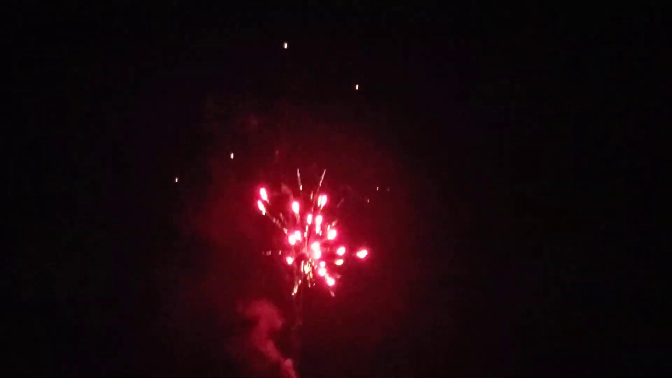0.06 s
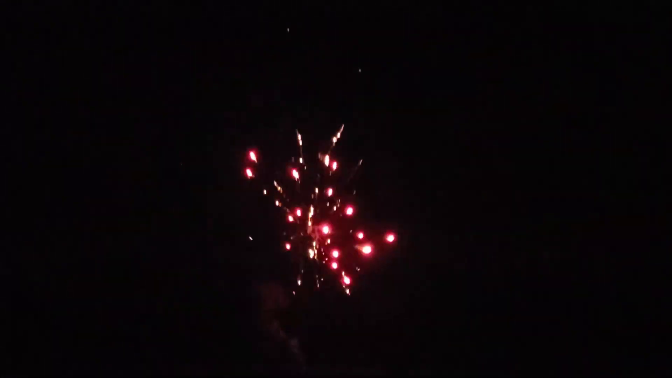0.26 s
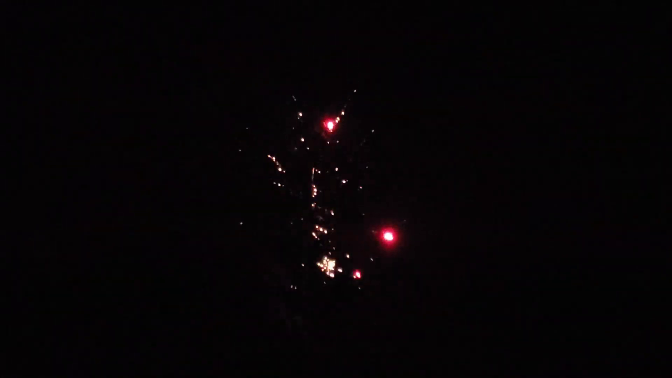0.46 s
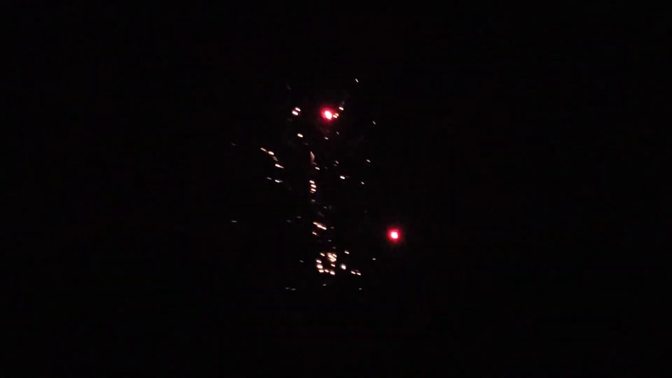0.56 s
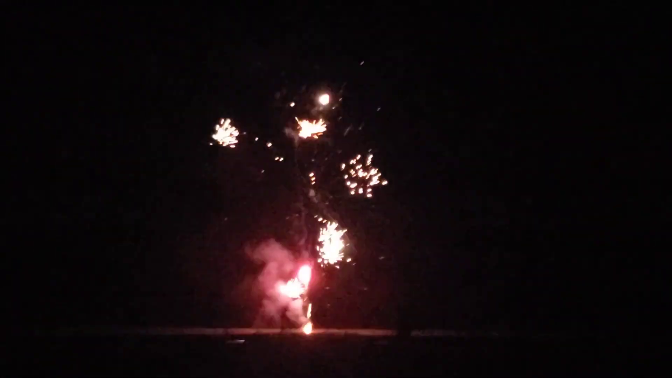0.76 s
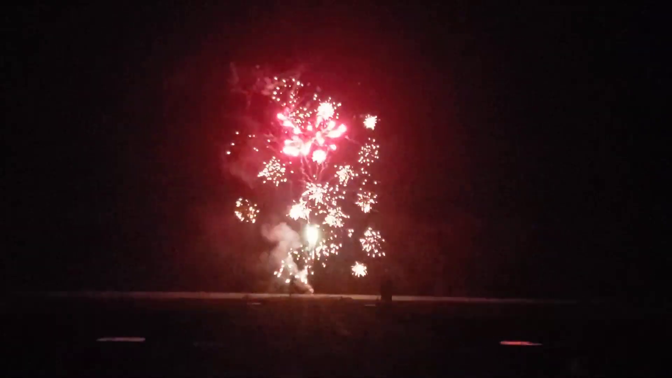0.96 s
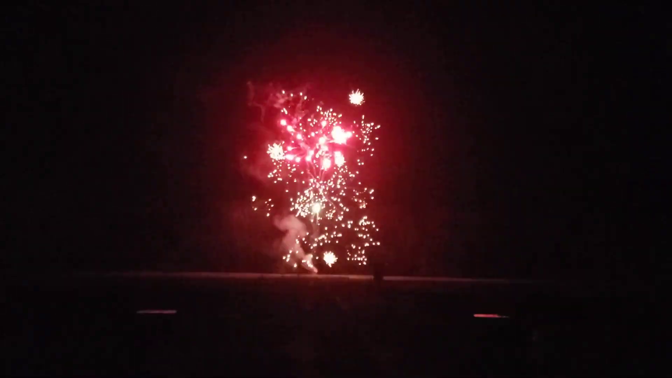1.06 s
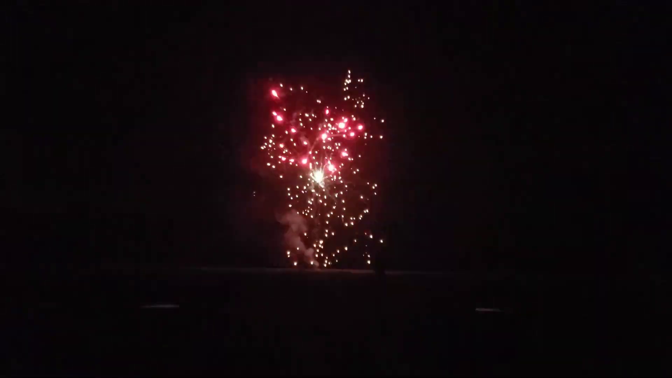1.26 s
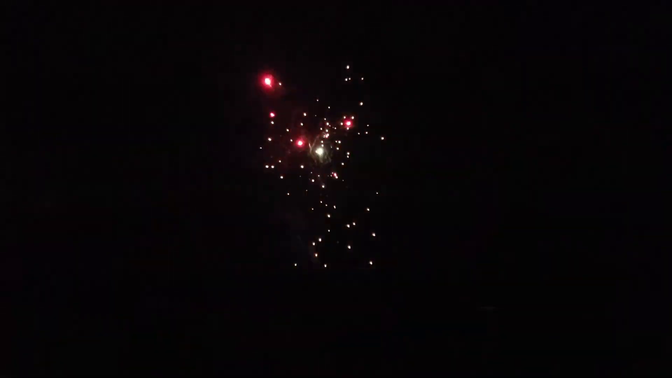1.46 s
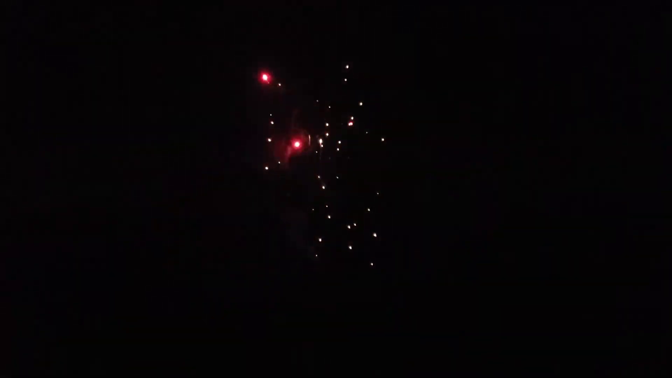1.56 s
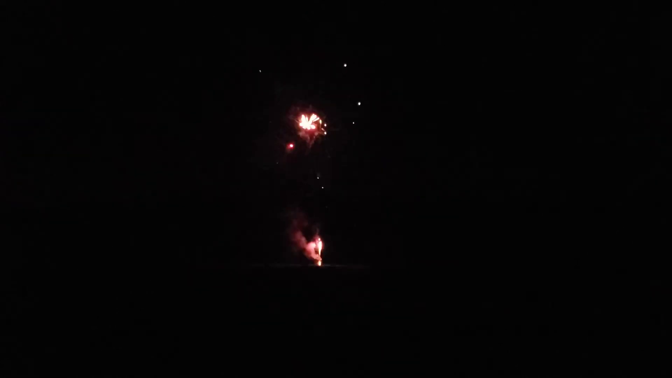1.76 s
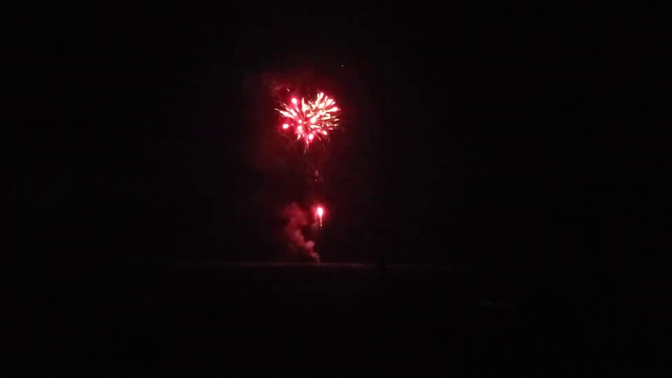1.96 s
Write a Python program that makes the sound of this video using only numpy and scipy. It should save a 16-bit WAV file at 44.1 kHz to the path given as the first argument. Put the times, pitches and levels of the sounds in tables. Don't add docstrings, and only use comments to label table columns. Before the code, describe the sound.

A dry firework crack with low thump, then near quiet with a high insect buzz; about a second later a launch pop, another bang and a rapid volley of crackles, outdoors at night, uneven stereo, brighter right.

```python
import sys
import numpy as np
from scipy import signal
from scipy.fft import rfft, irfft, next_fast_len
from scipy.io import wavfile

SR = 44100
rng = np.random.default_rng(int(sys.argv[2]) if len(sys.argv) > 2 else 0)


def volts(x):
    e = np.asarray(x, float) / 20
    return 10 ** e


def wav_out(sig):
    wavfile.write(sys.argv[1], SR, np.round(np.clip(np.atleast_2d(sig).T, -1, 1) * 32767).astype(np.int16))


N = 88200
MS = 1e-3

# (peak [dB], pulse length [ms], ground echo [dB], boom [dB], boom pitch [Hz], clutter [dB])
BLASTS = [
    (4.5, 0.49, -5.5, 0.5, 72, -16),
    (5.5, 0.27, -12.5, -4, 95, -2),
    (-16.5, 0.09, -14, -57, 55, 6.5),
]
# (time [s], ground echo delay [ms])
BLAST_TIMES = [
    (.2312, 1.2),
    (1.1564, 2.6),
    (1.0344, 1.1),
]
# (time [s], peak [dB], ground echo delay [ms], ground echo [dB])
STARS = [(.1095, -13, 1.8, -6), (1.0669, -14, 1.3, 0), (1.1696, -9, 1.1, -4), (1.1816, -13, 1.1, 0),
         (1.2172, -13, 1.4, -7), (1.2221, -12, 1.9, -5), (1.2497, -10, 1., -8), (1.2691, -12, 1.1, 0),
         (1.2739, -12, 1., -7), (1.2791, -13, 1., -4), (1.2871, -18, 1.1, -8), (1.2892, -10, 1.3, -5),
         (1.3223, -10, 1.5, -4), (1.3251, -12, 1.1, -3), (1.3323, -12, 1.9, -3), (1.3399, -12, 1., -8),
         (1.3462, -14, 1.1, -3), (1.3572, -13, 2., 0), (1.3661, -11, 1., -8), (1.3736, -12, 1., -8),
         (1.3897, -14, 1.4, -1), (1.4056, -12, 1.5, 3), (1.4204, -17, 1.9, 3), (1.4301, -12, 1.1, -8),
         (1.4394, -13, .9, -6), (1.4581, -7, 1.8, -4), (1.4868, -10, 1.5, -2), (1.4972, -9, 2.2, -1),
         (1.508, -14, 1.5, -6), (.5108, -27, .3, -9)]
# (time [s], peak [dB])
FAR_STARS = [
    (2.5, -33),
    (.8428, -14.5),
    (1.086, -45),
    (1, -31),
    (0.99, -19),
]
# (time [s], level [dB], pitch [Hz])
THUMPS = [
    (.004, -38, 250),
    (.383, -42, 110),
    (1.0344, -17, 270),
    (.566, -30, 420),
]
WALL_DB = [-22, -17, -15]
WALL_DELAYS = [7.8, 11.7, 18.1]
# (frequency [Hz], 60 dB decay [s])
FIELD_DECAY = [(100, .08), (400, .08), (900, .13), (3000, .12), (9000, .12)]
# (time [s], level [dB], brightness [dB])
FIZZ = [(0, -55, 3), (.06, -59.5, 1), (0.552, -59.5, 0.5), (0.567, -57, 17.5), (.6, -50, 3),
        (.63, -51.5, 3.5), (.66, -46, 0), (.75, -41.5, -6.5), (.87, -42.5, -8.5), (.96, -40.5, -15.5),
        (1.12, -46, -18), (1.3, -46.5, -40), (1.54, -52, 3), (1.62, -46.5, -1.5), (1.8, -45.5, -3.5),
        (2, -46.5, -6.5)]
# (frequency [Hz], level [dB])
FIZZ_LOW = [(60, -24), (300, -2), (500, 5), (900, -3.5), (1250, -4.5), (1700, -11), (2500, -37.5)]
# (frequency [Hz], level [dB])
FIZZ_HIGH = [(1200, -10.5), (2200, -1), (5000, -12.5), (7500, -17), (12000, -13)]
# (frequency [Hz], level [dB])
WING = [(10000, -60), (11400, -15), (12200, 10.5), (12900, 2.5), (13600, -2), (14600, 9), (15600, -2),
        (16500, -15)]
# (frequency [Hz], level [dB])
NIGHT = [(25, -20), (60, -0.5), (250, -7), (550, -2.5), (900, -15), (2000, -13), (4500, -24.5),
         (16000, -28.5)]
# (frequency [Hz], width [Hz], gain [dB])
CASE = [(560, 200, -6), (880, 350, 9)]
# (frequency [Hz], width [Hz], gain [dB])
OPEN_PORT = [(2090, 740, 0), (4480, 2440, 6.5), (8260, 1000, -23.5), (12420, 2650, -30.5)]
# (frequency [Hz], width [Hz], gain [dB])
COVERED_PORT = [(620, 150, -3), (1300, 800, 6), (2300, 700, -5), (3300, 1200, 4), (8000, 2000, -8),
                (10800, 3000, 10)]

STAR_MS, STAR_DB = .1, 6
STAR_BOOM_DB, STAR_BOOM_HZ = -18, 115
CLUTTER_DB, CLUTTER_T60, CLUTTER_HZ, CLUTTER_MS = 2, 0.011, 2340, .9
WALL_CLUTTER_DB, FIELD_DB = -4, -9.5
BOOM_CYCLES, BOOM_SAG = 3.04, 17
THUMP_CYCLES = 5
FIZZ_RATE, FIZZ_SPREAD_DB, FIZZ_SHARED = 4000, 2.5, 0.53
CHIRPS_PER_S, FIRST_S, PAIR_S = 62.93, .0033, .0063
CHIRP_DB, BUZZ_DB, SECOND_DB, CHIRP_S = -51, -63, 1, .00045
SNAP_DB, SNAP_S = -28.5, 2e-5
SLIDE_S_PER_KHZ, KATYDID_LEFT_DB = .00055, -30.5
CRICKET_HZ, CRICKET_WIDTH_HZ, CRICKET_DB, CRICKET_END_S = 3560, 120, -61.5, 0.38
NIGHT_DB, HISS_DB = -52, -71
COVER_HZ, COVER_DB, COVER_LAG_MS, COVER_TOP_HZ = 1860, -2, .05, 13800
COVER_LOW_HZ, BOOM_LEFT_DB = 110, -8
TOP_HZ, OVERLOAD = 15800, 1.


def unit(x):
    return x / np.sqrt(np.mean(x ** 2) + 1e-20)


def along(points, hz):
    f, v = np.transpose(points)
    return np.interp(np.log(hz + 1), np.log(f + 1), v)


def filtered(x, response):
    m = next_fast_len(N + 8192)
    return irfft(rfft(x, m) * response(np.fft.rfftfreq(m, 1 / SR)), m)[..., :N]


def add(into, s, piece):
    start = round(s * SR)
    part = into[..., start:start + piece.shape[-1]]
    part += piece[..., :part.shape[-1]]


def pulse(hz, ms):
    s = 2j * np.pi * hz * ms * MS
    return SR * ms * MS * s / (1 + s) ** 2


def heard(db, ms, echo_ms, echo_db, clutter_db):
    m = SR // 4
    hz, t = np.fft.rfftfreq(m, 1 / SR), np.arange(m) / SR

    def late(delay_ms):
        return np.exp(-2j * np.pi * hz * delay_ms * MS)

    clutter = rng.standard_normal(m) * volts(-60 * t / CLUTTER_T60)
    clutter = rfft(clutter / np.linalg.norm(clutter)) * 1j * hz / (CLUTTER_HZ + 1j * hz)
    f, u, z = signal.stft(rng.standard_normal(m), SR, nperseg=256)
    fade = volts(-60 * u / along(FIELD_DECAY, f)[:, None])
    tail = signal.istft(z * fade, SR, nperseg=256)[1][:m]
    field = volts(FIELD_DB) * late(3.5) * rfft(tail / np.linalg.norm(tail), m)

    near = 1 + volts(echo_db) * late(echo_ms) + volts(clutter_db) * late(CLUTTER_MS) * clutter
    walls = sum(volts(g) * late(d) for d, g in zip(WALL_DELAYS, WALL_DB))
    walls = walls * (1 + volts(WALL_CLUTTER_DB) * clutter)
    return volts(db) * irfft(pulse(hz, ms) * (near + walls + field), m)


def shells():
    air = np.zeros(N)
    for (s, echo_ms), (db, ms, echo_db, _, _, clutter_db) in zip(BLAST_TIMES, BLASTS):
        add(air, s, heard(db, ms, echo_ms, echo_db, clutter_db))
    return air


def stars():
    air = np.zeros(N)
    for s, db, echo_ms, echo_db in STARS:
        add(air, s, heard(db + STAR_DB, STAR_MS, echo_ms, echo_db, CLUTTER_DB))
    for s, db in FAR_STARS:
        add(air, s, heard(db, STAR_MS / 2, 1.32, -7, CLUTTER_DB))
    return air


def booms():
    out, t = np.zeros(N), np.arange(SR // 4) / SR
    heaves = [(s, db, hz) for (s, _), (_, _, _, db, hz, _) in zip(BLAST_TIMES, BLASTS)]
    heaves += [(s, db + STAR_BOOM_DB, STAR_BOOM_HZ) for s, db, _, _ in STARS]
    for s, db, hz in heaves:
        turns = hz * np.log1p(BOOM_SAG * t) / BOOM_SAG - .14
        envelope = volts(db - 60 * t * hz / BOOM_CYCLES) * (1 - np.exp(-t / 0.00013))
        add(out, s, envelope * np.sin(2 * np.pi * turns))

    def felt(hz):
        left = volts(BOOM_LEFT_DB) * 1j * hz / (COVER_LOW_HZ + 1j * hz)
        return np.array([left, np.ones_like(hz)])

    return filtered(out, felt)


def thumps():
    air, t = np.zeros(N), np.arange(SR // 8) / SR
    for s, db, hz in THUMPS:
        add(air, s, volts(db - 60 * t * hz / THUMP_CYCLES) * np.cos(2 * np.pi * hz * t))
    return air


def fizz():
    spread = volts(FIZZ_SPREAD_DB * np.minimum(rng.exponential(size=(3, N)), 2))
    size = spread * (rng.random((3, N)) < FIZZ_RATE / SR)
    pops = np.sqrt(FIZZ_SHARED) * size[0] + np.sqrt(1 - FIZZ_SHARED) * size[1:]
    pops = pops * rng.choice([-1, 1], N)
    low = filtered(pops, lambda hz: volts(along(FIZZ_LOW, hz)))
    high = filtered(pops, lambda hz: volts(along(FIZZ_HIGH, hz)))
    s, level_db, bright_db = np.transpose(FIZZ)
    t = np.arange(N) / SR
    level = volts(np.interp(t, s, level_db) + 1)
    bright = volts(np.interp(t, s, bright_db))
    return level * (low + bright * high) / np.sqrt(np.mean(low ** 2))


def katydid():
    t = np.arange(N) / SR

    def stroke(s, wide):
        from_stroke = (((t - s) * CHIRPS_PER_S + .5) % 1 - .5) / CHIRPS_PER_S
        return np.exp(-.5 * (from_stroke / wide) ** 2)

    def pair(wide):
        return stroke(FIRST_S, wide) + volts(SECOND_DB) * stroke(FIRST_S + PAIR_S, wide)

    def wing(hz):
        slide = np.exp(2j * np.pi * SLIDE_S_PER_KHZ * MS / 2 * (hz - 13500) ** 2)
        return volts(along(WING, hz)) * slide

    flip = rng.choice([-1, 1], N)[(2 * CHIRPS_PER_S * t).astype(int)]
    rasp = (volts(CHIRP_DB) * pair(CHIRP_S) + volts(BUZZ_DB)) * rng.standard_normal(N)
    snaps = volts(SNAP_DB) * flip * pair(SNAP_S)
    return filtered(rasp + snaps, wing) * volts([[KATYDID_LEFT_DB], [0]])


def cricket():
    noise = rng.standard_normal(N)
    band = unit(filtered(noise, lambda hz: np.exp(-.5 * ((hz - CRICKET_HZ) / CRICKET_WIDTH_HZ) ** 2)))
    return volts(CRICKET_DB) * band * np.clip((CRICKET_END_S - np.arange(N) / SR) / .05, 0, 1)


def night():
    a, b = rng.standard_normal((2, N))
    side = filtered(b, lambda hz: hz / (hz + 300))
    hush = filtered(np.array([a + side, a - side]), lambda hz: volts(along(NIGHT, hz)))
    return volts(NIGHT_DB) * unit(hush)


def peaks(hz, rows):
    response = 1
    for center, width, db in rows:
        spring = center * center - hz * hz
        damping = 1j * hz * width
        response = response * (spring + damping * volts(db / 2)) / (spring + damping * volts(-db / 2))
    return response


def ports(hz):
    lag = np.exp(-2j * np.pi * hz * COVER_LAG_MS * MS)
    cover = volts(COVER_DB) * lag / (1 + 1j * hz / COVER_HZ) ** 2 / (1 + (hz / COVER_TOP_HZ) ** 20)
    return peaks(hz, CASE) * np.array([cover * peaks(hz, COVERED_PORT), peaks(hz, OPEN_PORT)])


def scene():
    air = shells() + stars() + thumps() + fizz() + cricket() + night()
    return filtered(air, ports) + booms() + katydid()


def top_cut(x):
    return signal.sosfilt(signal.butter(12, 16500, fs=SR, output="sos"), x)


def record(dry):
    hiss = volts(HISS_DB) * rng.standard_normal(dry.shape) * volts([[-22], [0]])
    x = filtered(dry + hiss, lambda hz: 1 / (1 + (hz / TOP_HZ) ** 40))
    mix = x / (1 + np.abs(x / OVERLOAD) ** 6) ** (1 / 6)
    return top_cut(mix)


dry = scene()
out = record(dry)
wav_out(out)
```